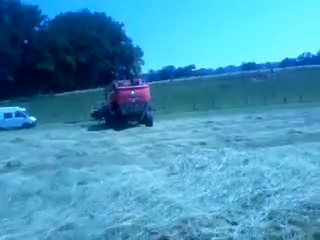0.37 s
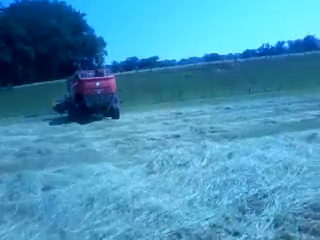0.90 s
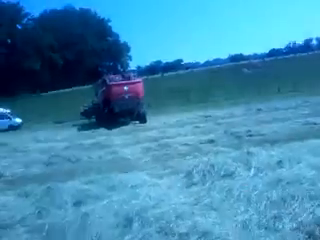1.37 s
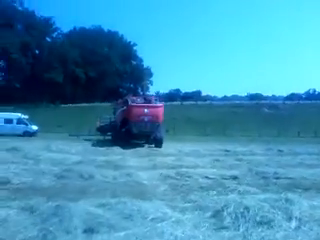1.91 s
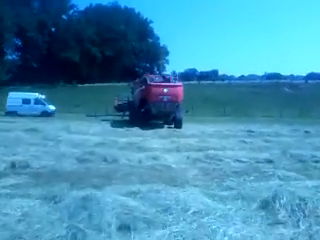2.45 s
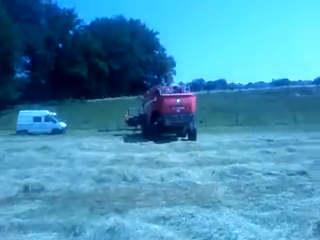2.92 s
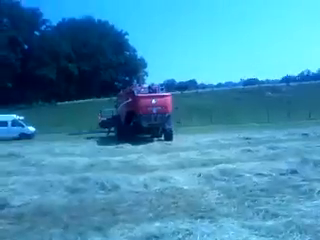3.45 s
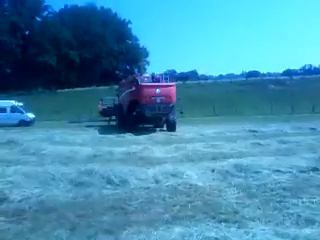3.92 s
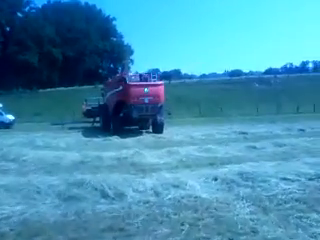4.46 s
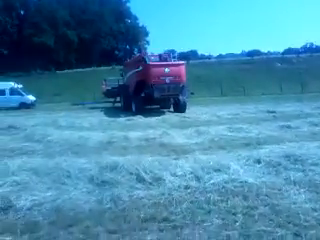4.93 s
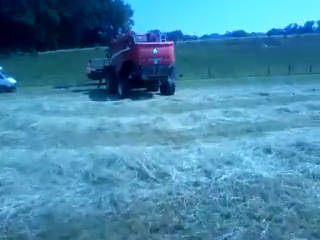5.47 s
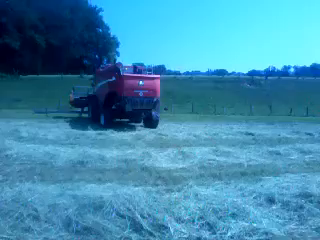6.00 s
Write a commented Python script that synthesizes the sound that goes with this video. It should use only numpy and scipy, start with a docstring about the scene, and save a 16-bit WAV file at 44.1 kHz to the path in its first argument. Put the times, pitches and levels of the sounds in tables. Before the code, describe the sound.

Outdoors in a hay field, a harvesting machine runs steadily at a distance for about six seconds. Its engine and drum hum hold almost one pitch, with tiny sags and recoveries, beneath fluttering hydraulic whines and a broad, patchy roar of fans and sieves. The roar, especially its low part, grows slightly as the listener walks nearer. Close, crisp straw swishes underfoot stand out around 0.8, 1.4, 2.5, 3.1, 4.15, 4.8, 5.3 and 6 seconds, with softer rustling in between that gradually rises. Fast, light metallic tapping emerges from about 2 to 3 seconds and more clearly from 4 to 5.8. A thin high whistle flutters from 4.4 to 5.8. At 5.2 a low, lumpy wind gust buffets the microphone with short thumps, fading after 5.5. The small microphone gives a limited treble, with little room echo.

```python
"""A hay field: a combine harvester works some way off while the listener walks towards it through dry straw.
One crankshaft speed drives the firing tone, gear meshes, drum hum, pump whines and panel taps, as sines and pulses.
Filtered noise makes the fans and sieves, with bands that go dark or whirr, and the swishes of straw underfoot.
Late on, a gust of low lumpy noise buffets the small microphone, which samples at a low rate."""
import sys
import numpy as np
from scipy import signal
from scipy.fft import rfft, irfft
from scipy.io import wavfile
from scipy.ndimage import uniform_filter1d, map_coordinates

SR = 44100
rng = np.random.default_rng(int(sys.argv[2]) if len(sys.argv) > 2 else 0)


def master(y):
    """Save y as 16-bit WAV."""
    cut = np.clip(np.atleast_2d(y).T, -1, 1)
    pcm = np.round(cut * 32767)  # scale
    wavfile.write(sys.argv[1], SR, pcm.astype(np.int16))


def ratio_of_db(decibels):
    """Turn decibels (scalar or array-like) into linear amplitude factors; 0 dB maps to 1."""
    return 10 ** (np.asarray(decibels, float) / 20)


N = 269010


def evened(x):
    """Scales to rms 1."""
    return x / np.sqrt(np.mean(x ** 2) + 1e-20)


def curves(rows):
    """Columns of a time table at every sample."""
    s, *columns = np.transpose(rows)
    return [np.interp(np.arange(N) / SR, s, c) for c in columns]


def coloured(x, points, below_db=-120, above_db=-120):
    """Filters by a (Hz, dB) table, with set gains outside it."""
    hz, db = np.transpose(points)
    bins = np.fft.rfftfreq(len(x), 1 / SR) + 1
    gain_db = np.interp(np.log(bins), np.log(hz), db, below_db, above_db)
    return irfft(rfft(x) * ratio_of_db(gain_db), len(x))


def drift(rate_hz):
    """Slow random wander of rms 1, smooth between random knots."""
    knots = rng.standard_normal(int(N / SR * rate_hz) + 6)
    at = np.arange(0, N + 32, 32)
    smooth = map_coordinates(knots, [2 + at * rate_hz / SR], order=3)
    return evened(np.interp(np.arange(N), at, smooth))


def tone(hz, db, flutter_db, flutter_hz):
    """A sine on a pitch curve; moving air between source and ear makes it flutter."""
    phase = 2 * np.pi * (np.cumsum(hz * np.ones(N)) / SR + rng.random())
    return np.sqrt(2) * ratio_of_db(db + flutter_db * drift(flutter_hz)) * np.sin(phase)


def spell(t, start, end, rise_s, fall_s):
    """0 to 1 and back, with soft edges centred on start and end."""
    rise = 1 + np.tanh(2 * (t - start) / rise_s)
    fall = 1 + np.tanh(2 * (end - t) / fall_s)
    return rise * fall / 4


def heard(spells, quiet_db, rise_s, fall_s):
    """Level in dB of a sound that idles at quiet_db and adds power during each (start, end, dB) spell."""
    t = np.arange(0, N + 64, 64) / SR
    power = ratio_of_db(quiet_db) ** 2
    for start, end, db in spells:
        power = power + (ratio_of_db(db) * spell(t, start, end, rise_s, fall_s)) ** 2
    return np.interp(np.arange(N) / SR, t, 10 * np.log10(power))


def bands(hz, t, rows, width_hz):
    """dB field of bands that appear for a while and glide in pitch."""
    field_db = 0
    for start, end, from_hz, to_hz, db in rows:
        centre_hz = np.interp(t, (start, end), (from_hz, to_hz))
        across = np.exp(-((hz[:, None] - centre_hz) / width_hz) ** 2)
        field_db = field_db + db * spell(t, start, end, .25, 0.23) * across
    return field_db


def crank_speed():
    """Crankshaft turns per second, sagging and recovering with load."""
    # Each row: time in seconds, crankshaft speed in Hz.
    speed = [(0.0, 28.74), (0.5, 28.71), (0.9, 28.74), (1.25, 28.71), (1.36, 28.75), (1.47, 28.97),
             (1.6, 29.01), (1.98, 28.79), (2.25, 28.8), (2.5, 28.74), (2.85, 28.76), (2.95, 28.92),
             (3.17, 28.93), (3.32, 28.6), (3.46, 28.79), (3.68, 28.77), (3.83, 29.01), (4.4, 28.94),
             (4.75, 28.94), (5.3, 28.87), (5.8, 28.88), (6.1, 28.96)]
    return curves(speed)[0]


def engine(crank_hz):
    """Gear meshes that swell, steady crank orders including the firing tone, and a weak comb of half orders."""
    # Crank orders of the gear meshes.
    gear_orders = (6, 16, 36, 50, 100)
    # Each row, one per gear order: idle level in dB, spells of start in seconds, end in seconds, level in dB.
    gears = [(-47.5, [(1.5, 3.4, -47.5), (3.8, 6.3, -47.5)]), (-58, [(1.4, 1.8, -54.5), (3.0, 3.4, -53),
             (4.1, 6.3, -49.5), (5.0, 6.3, -50)]), (-59, [(.6, .95, -55), (1.5, 2.5, -54),
             (3.3, 3.75, -52.5), (4.05, 6.3, -47.5), (4.3, 6.3, -47)]), (-67.5, [(1.35, 1.8, -50),
             (2.5, 3.0, -51), (4.0, 5.8, -53.5)]), (-59, [(.25, .55, -54), (1.55, 1.75, -50),
             (2.0, 3.25, -49), (3.4, 3.75, -54), (3.75, 4.5, -47), (5.05, 6.3, -52)])]
    # Steady tones locked to the crankshaft. Each row: multiple of the crank speed, level in dB.
    crank_orders = [(3, -52.5), (12, -61.5), (13, -58.5), (14, -57.5), (16.5, -57.5), (18, -56.5),
                    (19, -57), (19.5, -57.5), (20, -62), (24, -60), (25.5, -60), (34, -71.5), (37.5, -70.5),
                    (48.6, -57.5), (49.5, -69.5), (58.3, -64), (73.5, -60), (89.5, -66), (91.5, -67),
                    (103.4, -58), (150, -65)]
    # The four-stroke cycle repeats every second turn. Each row: crank order, level of the half orders in dB.
    half_orders = [(4, -71.5), (7, -60.5), (20, -63.5), (40, -66.5), (52, -68), (59, -72.5), (66, -68),
                   (120, -71)]
    edge_s = 0.24
    swelling = sum(tone(k * crank_hz, heard(spells, db, edge_s, edge_s), 1.2, 12)
                   for k, (db, spells) in zip(gear_orders, gears))
    steady = sum(tone(k * crank_hz, db, 1.1, 5) for k, db in crank_orders)
    order = np.arange(8, 241) / 2
    uneven_db = np.interp(order, *np.transpose(half_orders)) + 1.5 * rng.standard_normal(len(order))
    spectrum = ratio_of_db(uneven_db) * np.exp(2j * np.pi * rng.random(len(order)))
    # one waveform spans two turns, so bin 8 is order 4
    cycle = irfft(np.r_[np.zeros(8), spectrum], 8192) * 8192 / np.sqrt(2)
    angle = np.cumsum(crank_hz) / SR / 2 % 1
    return swelling + steady + np.interp(angle, np.arange(8192) / 8192, cycle, period=1)


def drum(crank_hz):
    """Bars and blades of the belt-driven drum and fan beat the air evenly."""
    # Each row: multiple of the crank speed, level at the start in dB.
    beats = [(4.69, -44.5), (9.38, -56.5), (11.81, -61.5), (20.69, -67), (27.59, -56.5)]
    nearing_db = 0.29 * np.arange(N) / SR  # grows as the machine nears
    return sum(tone(k * crank_hz, db + nearing_db, 0.7, 5) for k, db in beats)


def pump(crank_hz):
    """Hydraulic piston pulses whine, most in the even multiples; the higher ones flutter more."""
    # Multiples of the piston rate that come through in spells as air and angle change.
    multiples = (4, 6, 8, 2, 3, 5, 7, 9, 14)
    # Each row, one per multiple: idle level in dB, spells of start in seconds, end in seconds, level in dB.
    whines = [(-46, [(.66, 1.5, -42), (.87, 1.03, -41), (1.5, 2.97, -46), (1.87, 2.5, -45.5),
              (3.1, 3.79, -46), (4.4, 5.05, -50), (5.05, 5.67, -43), (5.8, 6.03, -42)]),
              (-56.5, [(.08, 1.25, -47), (1.43, 1.61, -48), (2.85, 3.58, -51.5), (3.6, 4.5, -52.5),
              (5.12, 6.3, -48.5), (5.4, 6.3, -49.5), (5.68, 6.3, -42.5)]), (-50.5, [(.17, .38, -39.5),
              (.47, .58, -39.5), (.77, 1.1, -41.5), (.81, .89, -39), (1.36, 1.6, -42.5), (1.64, 1.72, -44),
              (1.85, 2.1, -44.5), (2.3, 2.62, -44.5), (3.03, 3.09, -43), (3.27, 3.39, -38.5),
              (3.49, 3.56, -38), (3.63, 4.1, -47), (3.78, 4.1, -41.5), (4.15, 4.58, -46.5),
              (4.7, 6.3, -41.5), (4.85, 5.04, -41.5), (5.27, 5.7, -41)]), (-63, [(.15, 1.6, -52.5),
              (1.9, 3.7, -56)]), (-67.5, [(1.05, 1.35, -51.5), (3.1, 3.7, -59), (4.65, 6.3, -51.5)]),
              (-69, [(.95, 1.55, -54), (2.28, 2.78, -52), (2.95, 3.24, -52), (5.0, 5.55, -52)]),
              (-61.5, [(.8, 1.65, -49.5), (2.15, 2.5, -51), (2.62, 2.95, -51), (4.2, 5.3, -53.5)]),
              (-57.5, [(.25, .75, -46.5), (.75, 1.4, -52.5), (1.95, 2.2, -49), (2.48, 3.0, -49),
              (3.3, 3.5, -53), (3.72, 4.3, -48.5), (5.3, 5.8, -56)]), (-65, [(1.4, 1.62, -51),
              (1.98, 2.32, -50), (3.25, 3.45, -50), (4.4, 4.6, -51)])]
    # Each row: multiple of the piston rate, steady level in dB.
    top_whines = [(10, -65), (11, -58), (12, -55.5)]
    rise_s, fall_s = .05, .09
    piston_hz = 32 / 3 * crank_hz  # pistons per crank turn
    fading = sum(tone(k * piston_hz, heard(spells, db, rise_s, fall_s), 0.13 * k, 25)
                 for k, (db, spells) in zip(multiples, whines))
    return fading + sum(tone(k * piston_hz, db, 2.5, 3.3) for k, db in top_whines)


def roar():
    """Patchy broad noise of fans and sieves; some bands go dark, others whirr."""
    # Colour of the fans and sieves. Each row: frequency in Hz, relative density in dB per Hz.
    colour = [(40, -37.5), (75, -12), (110, -2), (190, 11.5), (320, 2), (550, 5), (800, -0.5), (1100, 1.5),
              (1400, 1), (1850, 0.5), (2100, 2.5), (2500, 6.5), (2800, -0.5), (3500, 3.5), (4100, 5),
              (5000, 1), (6900, 14), (8000, -3)]
    # Bands that go dark for a while, the low one likely a ground echo.
    # Each row: start in seconds, end in seconds, from Hz, to Hz, full depth in dB.
    dark_bands = [(-.2, 1.2, 1540, 1460, -5), (1.6, 2.1, 1580, 1400, -7.5), (2.6, 3.6, 1800, 1900, -7),
                  (3.5, 5.2, 1660, 1780, -13), (5.2, 5.85, 1770, 1660, -11), (4.5, 4.15, 2250, 2250, -7),
                  (5.5, 6.3, 2680, 2680, -5)]
    # Bands that whirr louder. Each row: start in seconds, end in seconds, from Hz, to Hz, full lift in dB.
    whirr_bands = [(-.2, 1.21, 2850, 2920, 3), (1.598, 3.446, 2930, 3090, 8), (3.8, 5.898, 3400, 3110, 4.5),
                   (2.35, 3.05, 3800, 4050, 4), (4.9, 5.6, 2400, 2400, 3)]
    base_db, nearing_db_per_s, rumble_db_per_s = -35.5, 0.3, .75  # base is ahead of the colour
    hz, t, z = signal.stft(rng.standard_normal(N), SR, nperseg=1024, noverlap=768)
    patches = rng.standard_normal(z.shape[::-1]).T
    patches = uniform_filter1d(patches, 5, axis=0)
    patches = evened(uniform_filter1d(patches, 60, axis=1))
    shape_db = bands(hz, t, dark_bands, 140) + bands(hz, t, whirr_bands, 180)
    # the roar grows as the machine nears, more so under 450 Hz
    low_share = 1 / (1 + (hz[:, None] / 450) ** 4)
    nearing_db = base_db + t * (nearing_db_per_s + rumble_db_per_s * low_share)
    z = z * ratio_of_db(nearing_db + shape_db + 2.05 * patches)
    noise = signal.istft(z, SR, nperseg=1024, noverlap=768)[1][:N]
    return coloured(noise, colour)


def straw():
    """Thousands of stalks a second rub and snap, loudest in the swishes, and never fall silent between."""
    # Swishes in dry straw: strong ones from footsteps, weaker rustles between.
    # Each row: peak time in seconds, peak level in dB, rise in seconds, fall in seconds.
    swishes = [(.11, -34.5, 0.031, .03), (.2, -33.5, .03, 0.084), (.4, -34.5, 0.055, 0.03),
               (.6, -41, 0.045, .05), (.77, -22, 0.058, 0.097), (0.949, -28, .04, 0.062),
               (1.2, -32, .06, 0.089), (1.44, -25.5, 0.14, 0.093), (1.7, -31.5, 0.079, 0.055),
               (1.99, -32, .06, .03), (2.17, -37, 0.04, 0.037), (2.459, -29, .04, 0.036),
               (2.619, -36, 0.087, 0.47), (3.055, -27, 0.015, 0.029), (3.6, -30, 0.12, 0.088),
               (3.74, -31.5, .03, 0.05), (4.15, -23, 0.081, 0.053), (4.3, -30, 0.048, .07),
               (4.76, -22.5, 0.06, 0.069), (4.98, -37.5, 0.13, 0.043), (5.3, -21, 0.065, 0.11),
               (5.49, -28, .04, 0.044), (5.7, -35, .1, 0.12), (5.96, -23, 0.071, .04)]
    # Colour of the snaps. Each row: frequency in Hz, relative density in dB per Hz.
    colour = [(1500, -31.5), (3300, -23.5), (4200, -12.5), (5500, -9), (6400, -4), (7000, 1), (8000, -13)]
    snaps_per_s, rustle_db, rustle_db_per_s = 15000, -43, 1.75
    t = np.arange(N) / SR
    snaps = (rng.random(N) < snaps_per_s / SR) * rng.standard_normal(N)
    snaps = snaps * ratio_of_db(1.7 * np.minimum(rng.exponential(1, N), 5))  # a few are much louder
    clumps_db = .4 * drift(60)
    power = ratio_of_db(rustle_db + rustle_db_per_s * t) ** 2
    for s, db, rise_s, fall_s in swishes:
        swell = ratio_of_db(db) * np.exp(-((t - s) / np.where(t < s, rise_s, fall_s)) ** 2 / 2)
        power = power + swell ** 2
    return np.sqrt(power) * ratio_of_db(clumps_db) * evened(coloured(snaps, colour))


def clatter(crank_hz):
    """Valve gear taps two panels, which ring for a few milliseconds, a little differently every cycle."""
    # Each row, one per panel: ringing frequency in Hz, resonance width in Hz.
    panels = [(2980, 260), (3260, 240)]
    # Each panel has rows of: share of the engine cycle from 0 to 1, relative strength in dB.
    panel_taps = [
        [(.985, -1), (.25, -1), (.48, 0), (.75, 0)],
        [(.12, -7), (.27, -8), (.615, 0), (.69, -8), (.91, -4)],
    ]
    # A panel is heard while it faces the listener. Each has rows of: time in seconds, level in dB.
    panel_facing = [
        [(1.7, -75), (2, -50), (2.8, -48), (3.2, -52), (3.4, -75)],
        [(3.8, -75), (4.1, -52), (4.5, -44), (5, -44), (5.55, -43.5), (5.85, -53), (6, -75)],
    ]
    cycles = np.cumsum(crank_hz) / SR / 2
    t = np.arange(800) / SR
    out = 0
    for (hz, width_hz), taps, facing in zip(panels, panel_taps, panel_facing):
        # a blow falls where the cycle count passes each tap's share
        blows = sum(ratio_of_db(db) * np.diff(np.floor(cycles - share), prepend=-1) for share, db in taps)
        blows = blows * ratio_of_db(1.9 * rng.standard_normal(N))
        ring = t * np.exp(-np.pi * width_hz * t) * np.sin(2 * np.pi * hz * t)
        ringing = evened(signal.oaconvolve(blows, ring)[:N])
        out = out + ratio_of_db(curves(facing)[0]) * ringing
    return out


def whistle(crank_hz):
    """One thin, high, fluttering line locked to the crank, heard for a while."""
    # Each row: start in seconds, end in seconds, level in dB.
    spells = [(4.42, 4.75, -49), (4.75, 5.8, -48.5)]
    return tone(111.5 * crank_hz, heard(spells, -75.5, .15, .15), 1.6, 17)


def gust():
    """Low lumpy pressure on the microphone port sets in, holds and dies away, with a few short pushes."""
    # Colour of the buffeting. Each row: frequency in Hz, relative density in dB per Hz.
    colour = [(40, -31), (100, -11), (170, 0.5), (400, 1.5), (600, -6.5), (1200, -37)]
    # Single pushes in the gust. Each row: time in seconds, peak level in dB, length in milliseconds.
    thumps = [(5.245, -24, 3.5), (5.391, -32, 4.5), (5.423, -27, 2.4), (5.455, -29, 5.9),
              (5.594, -23.5, 4.4)]
    start_s, rise_s, hold_s, level_db, fall_db_per_s = 5.21, .04, 0.31, -38.5, 22
    lumps = rng.standard_normal(N) * ratio_of_db(1.8 * drift(50))
    t = np.arange(N) / SR
    dying_db = fall_db_per_s * np.maximum(t - start_s - hold_s, 0)
    blowing = spell(t, start_s, N / SR + 1, rise_s, rise_s) * ratio_of_db(level_db - dying_db)
    out = blowing * evened(coloured(lumps, colour))
    for s, db, ms in thumps:
        u = (t - s) * 1000 / ms
        out = out + ratio_of_db(db) * np.exp(-1.5 * u ** 2) * np.cos(2 * np.pi * u)
    return out


def scene():
    """Machine, straw underfoot and wind, as one channel."""
    crank_hz = crank_speed()
    machine = engine(crank_hz) + drum(crank_hz) + pump(crank_hz) + roar()
    machine = machine + clatter(crank_hz) + whistle(crank_hz)
    return (machine + straw() + gust())[None]


def top_cut(x):
    """Nothing passes above the cut-off."""
    return signal.sosfilt(signal.butter(12, 9050, fs=SR, output="sos"), x)


def record(dry):
    """Low-pass, then resampling leaves a faint mirror of the treble about half the capture rate."""
    # Low-pass before sampling. Each row: frequency in Hz, gain in dB.
    low_pass = [(7200, -1), (7450, -10), (7700, -21), (7850, -43.5), (8000, -78)]
    # Mirror of the top band left by resampling. Each row: frequency in Hz, gain in dB.
    mirror_gain = [(8000, -2), (8300, -9.5), (8600, -18), (8850, -32), (9100, -33.5)]
    capture_hz = 16000
    kept = coloured(dry[0], low_pass, below_db=-0.5)
    mirrored = 2 * kept * np.cos(2 * np.pi * capture_hz * np.arange(N) / SR)
    mix = kept + coloured(mirrored, mirror_gain)
    return top_cut(mix[None])


dry = scene()
out = record(dry)
master(out)
```